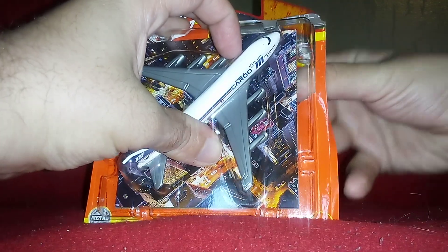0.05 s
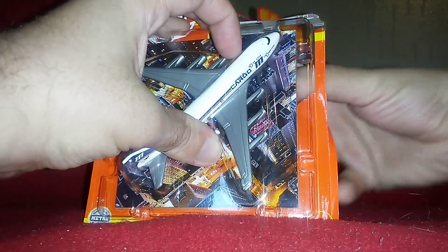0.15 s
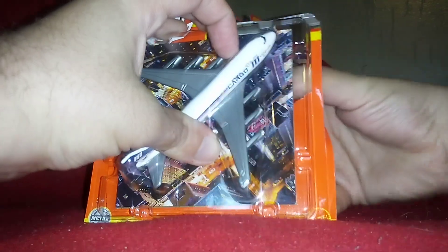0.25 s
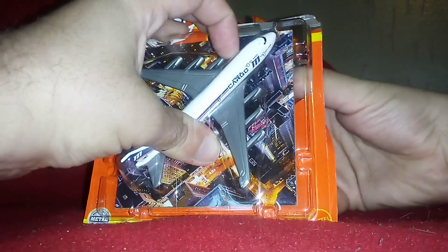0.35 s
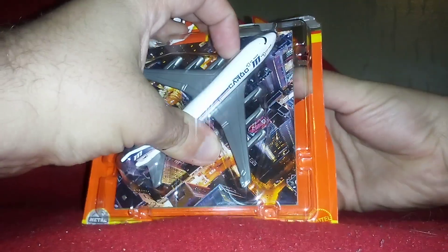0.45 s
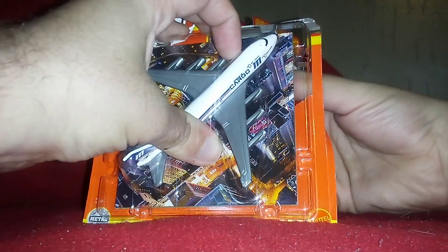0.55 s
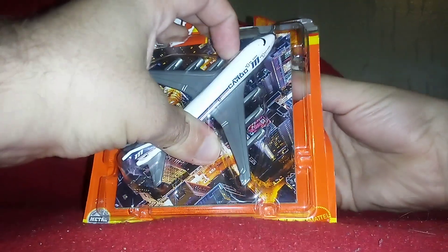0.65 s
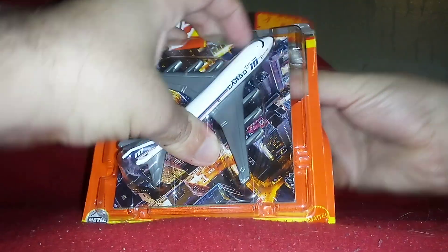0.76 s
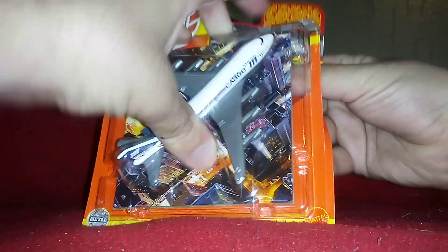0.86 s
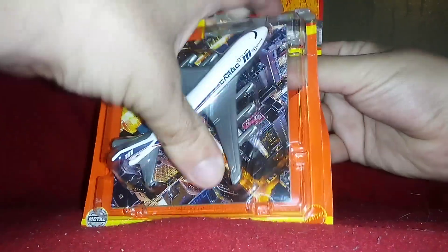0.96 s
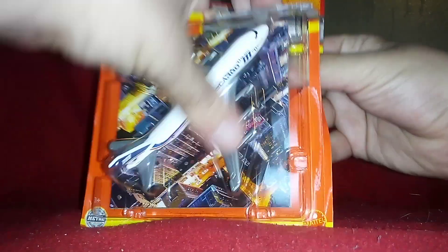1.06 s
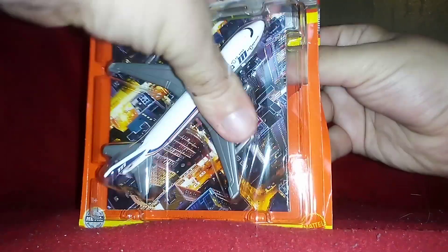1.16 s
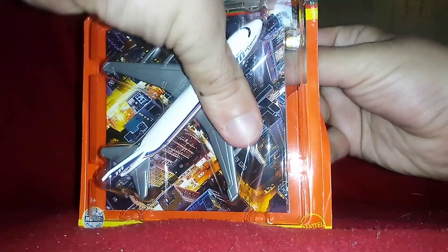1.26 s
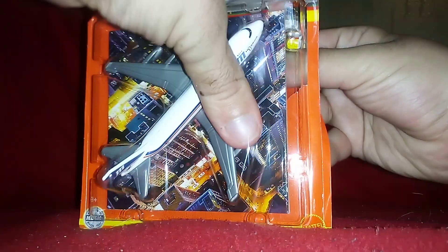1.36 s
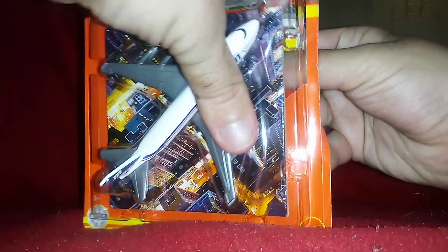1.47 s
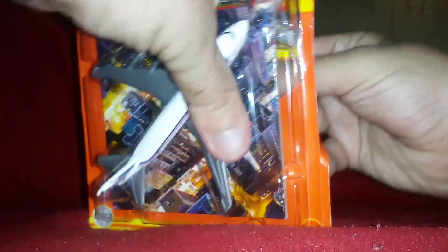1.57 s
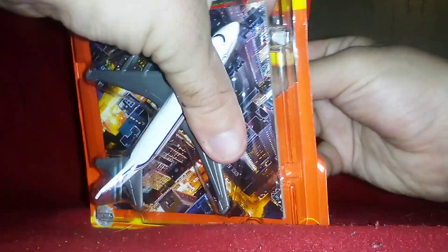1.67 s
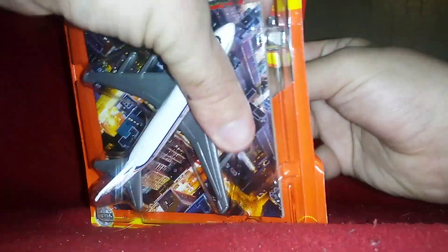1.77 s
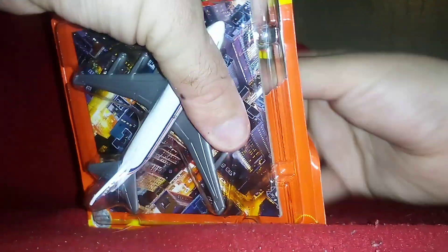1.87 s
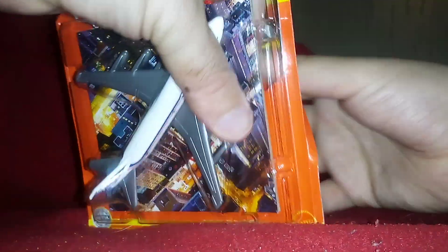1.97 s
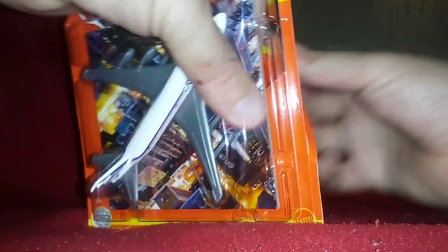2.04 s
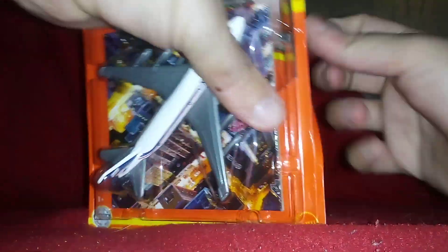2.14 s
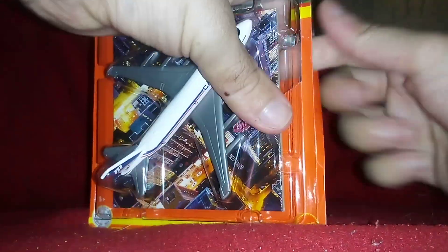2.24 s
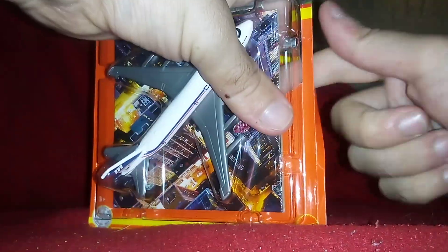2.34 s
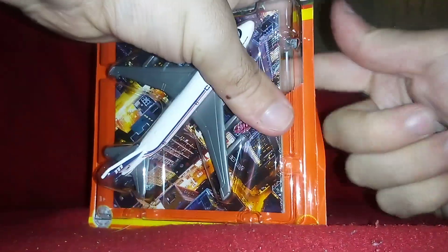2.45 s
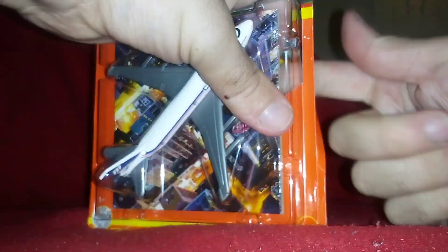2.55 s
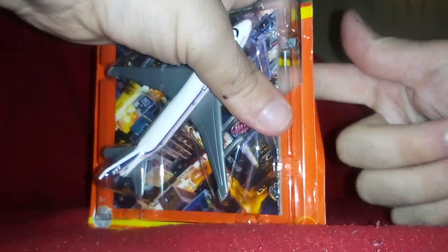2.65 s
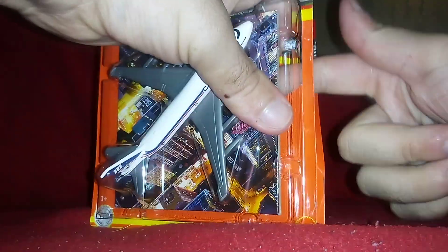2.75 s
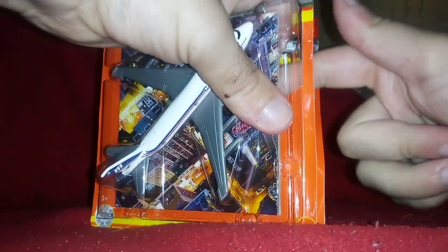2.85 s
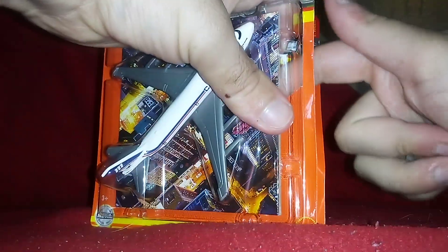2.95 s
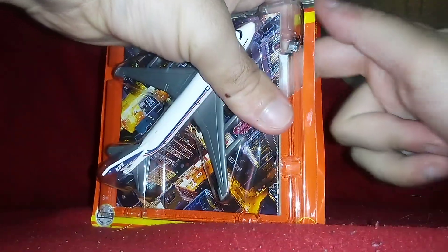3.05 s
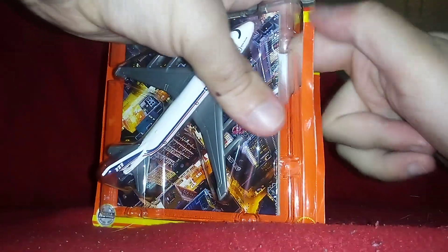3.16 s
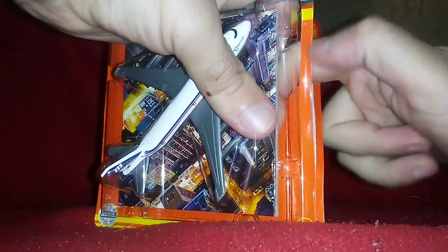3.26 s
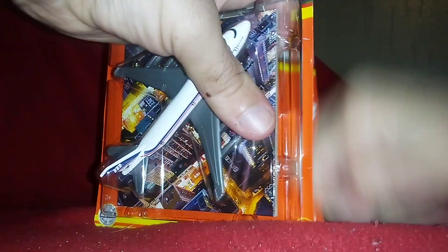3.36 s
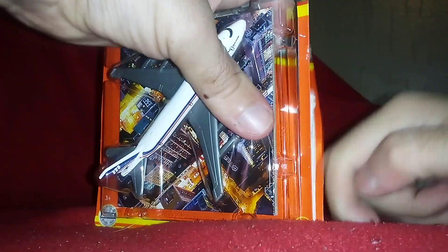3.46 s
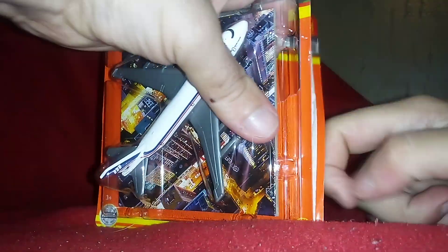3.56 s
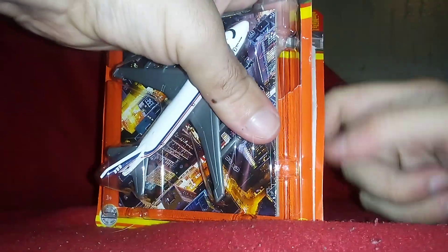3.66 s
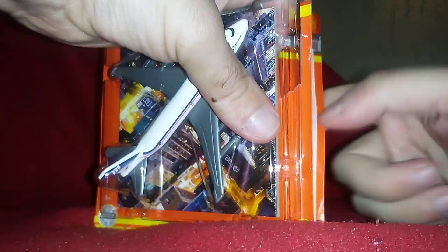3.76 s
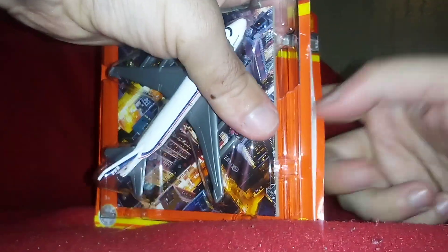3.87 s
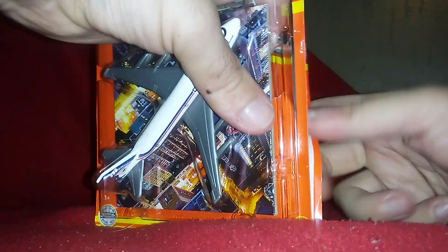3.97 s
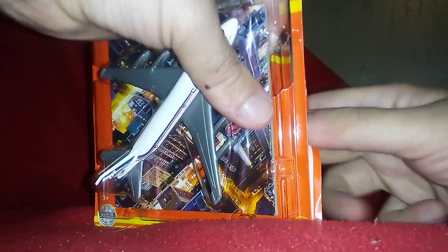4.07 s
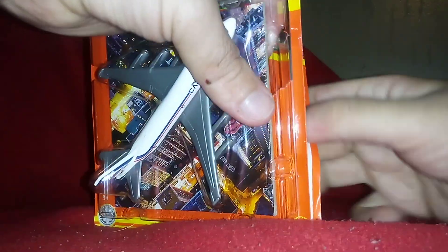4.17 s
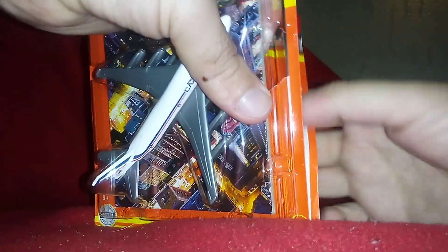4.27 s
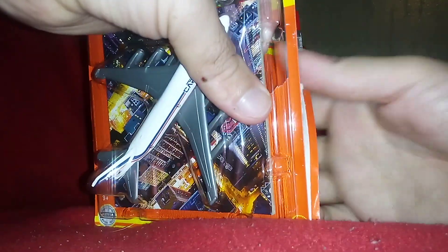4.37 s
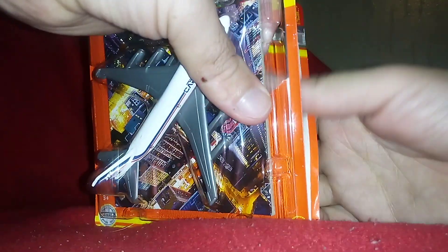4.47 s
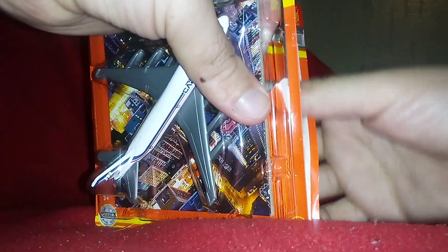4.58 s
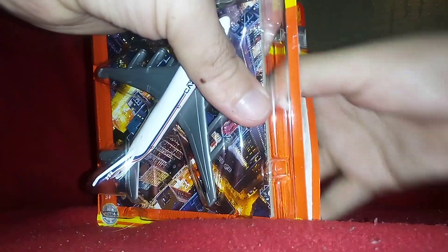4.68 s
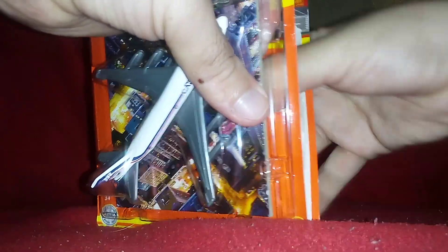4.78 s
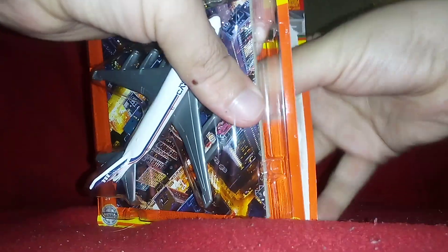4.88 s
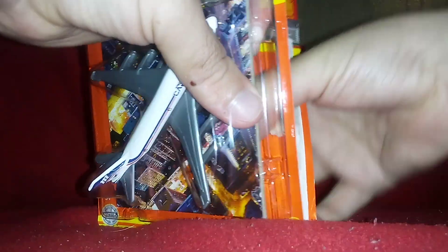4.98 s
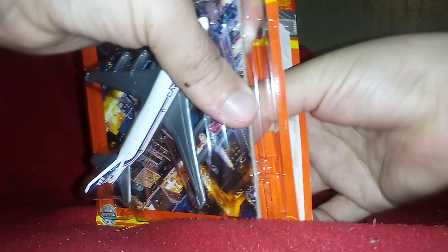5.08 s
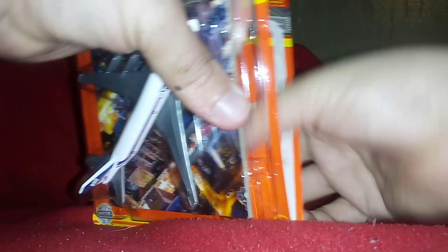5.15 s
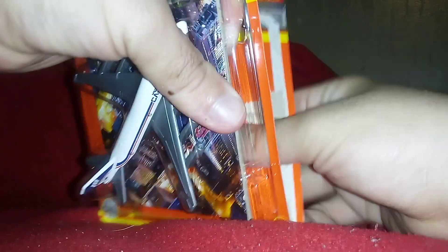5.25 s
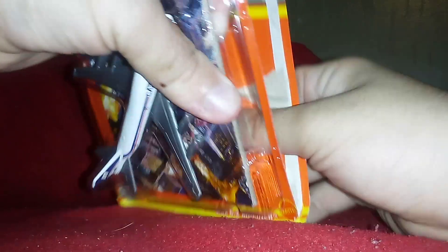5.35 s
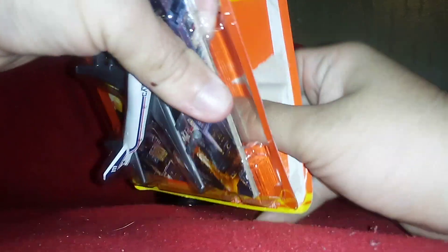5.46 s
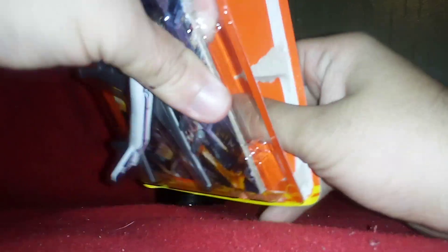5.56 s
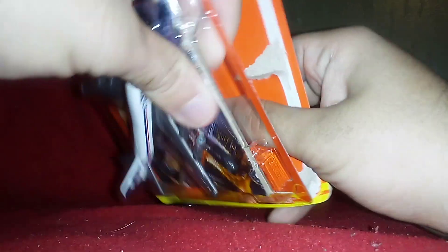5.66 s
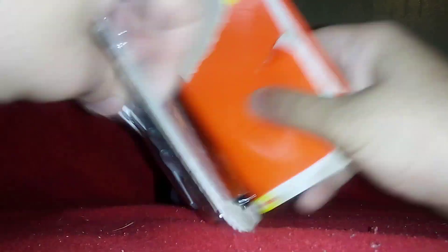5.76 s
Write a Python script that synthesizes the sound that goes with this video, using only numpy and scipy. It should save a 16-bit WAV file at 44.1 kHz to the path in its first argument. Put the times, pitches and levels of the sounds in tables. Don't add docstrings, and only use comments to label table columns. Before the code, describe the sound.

Hands pry and peel a hollow plastic blister pack from its card, with creaks, sharp pops, film ticks and grainy crackling, close and dry.

```python
import sys
import numpy as np
from scipy import signal
from scipy.io import wavfile
from scipy.ndimage import uniform_filter1d

SR = 44100
rng = np.random.default_rng(int(sys.argv[2]) if len(sys.argv) > 2 else 0)


def how_loud(loudness_db):
    steps = np.asarray(loudness_db, float) / 20
    return 10 ** steps


def store_wav(level_fs):
    pcm = np.round(np.clip(np.atleast_2d(level_fs), -1, 1) * 32767)
    wavfile.write(sys.argv[1], SR, pcm.T.astype(np.int16))


N = 256662

# [f/Hz, width/Hz, level/dB]
BODY = [(366, 100, -11), (490.3, 37, -5.5), (567, 90, -7), (738, 170, -2), (882, 73, 1),
        (1117.6, 103, -2.5), (1230, 90, 0), (1303, 100, -4.5), (1693, 190, -7)]
# [f/Hz, width/Hz, level/dB]
CARD = [(1925, 150, 4), (2390, 377, 0.5), (2797, 584, 0.5), (3270, 880, -1), (4040, 1370, -7.5)]
# [f/Hz, width/Hz, level/dB]
FILM = [(4590, 530, -10), (6090, 2120, -8), (6574, 350, -1.5), (7250, 700, -4.5), (7760, 1900, -8)]
# [f/Hz, width/Hz, level/dB]
TABLE = [(80, 36, -1), (132, 69, -1.5), (182, 95, 1), (265, 140, 1.5)]
# [t/s, peak level/dB, strongest f/Hz]
CREAKS = [(0.195, -46, 1170), (0.303, -40, 1100), (0.43, -44, 1750), (0.453, -40.5, 1360),
          (0.519, -41, 946), (0.595, -42, 1075), (1.349, -30.5, 491.5), (1.203, -31.5, 1390),
          (1.628, -47, 1160), (1.811, -41.5, 828), (1.982, -41, 793), (2.338, -43, 1120),
          (0.227, -31.5, 1450), (5.645, -31.5, 1210), (3.059, -57, 940), (3.762, -35, 934),
          (5.244, -34.5, 766), (5.418, -35.5, 1190), (3.13, -44.5, 710), (3.26, -54, 880),
          (3.359, -30.5, 740), (3.56, -49, 775), (3.897, -52.5, 1230), (4.271, -46, 1240),
          (4.408, -76, 743), (4.882, -41.5, 1250), (5.125, -45.5, 704), (5.196, -40, 1190),
          (5.287, -35, 1100), (5.455, -35.5, 933)]
# [t/s, peak level/dB, strongest f/Hz, card edge level/dB]
POPS = [(0.199, -43.5, 960, -38), (0.22, -37, 1500, -37), (0.373, -36.5, 382, -77),
        (0.42, -37.5, 1350, -46), (0.955, -31.5, 995, -36.5), (1.121, -29.5, 930, -45),
        (1.143, -31.5, 850, -64), (1.287, -32, 637, -46), (1.35, -24, 864, -40), (1.526, -14.5, 883, -32.5),
        (1.534, -21.5, 1100, -33), (1.931, -35, 834, -41), (2.263, -28.5, 920, -39.5),
        (2.858, -29.5, 1183, -46.5), (3.224, -35, 1200, -42), (3.284, -18.5, 1154, -30.5),
        (3.301, -13.5, 732, -32), (3.378, -20, 1244, -45), (3.485, -31.5, 786, -41.5),
        (3.754, -23, 943, -53), (4.657, -33.5, 1230, -49), (4.792, -32.5, 824, -38.5),
        (5.008, -33.5, 693, -66), (5.404, -28, 806, -46), (5.487, -34, 404, -43.5), (5.712, -28, 900, -53),
        (5.699, -17.5, 742, -29), (5.704, -16, 1155, -28), (5.738, -23.5, 626, -36),
        (5.753, -14.5, 1270, -30)]


def rms_one(x):
    return x / np.sqrt(np.mean(x ** 2) + 1e-20)


def drift(rate):
    step = 40
    r = np.exp(-2 * step * np.pi * rate / SR)
    noise = rng.standard_normal(N // step + 2002)
    slow = signal.lfilter([1], [1, -2 * r, r * r], noise)[2000:]
    return np.interp(np.arange(N) / step, np.arange(len(slow)), rms_one(slow))


def resonate(x, hz, width_hz):
    r = np.exp(-np.pi * width_hz / SR)
    zeros = np.array([1, 0, -1]) * (1 - r * r) / 2
    poles = [1, -2 * r * np.cos(2 * np.pi * hz / SR), r * r]
    return signal.lfilter(zeros, poles, x)


def within(x, modes):
    edges_hz = [0.91 * modes[0][0], 1.177 * modes[-1][0]]
    return signal.sosfilt(signal.butter(3, edges_hz, "band", fs=SR, output="sos"), x + 1e-18)


def near(modes, hz, fall_db):
    own = (hz, np.mean(np.array(modes)[:, 1]), 1.5)
    others = [(f, width_hz, level_db - fall_db * abs(np.log2(f / hz))) for f, width_hz, level_db in modes]
    return [own] + others


def struck(modes, t60, slip_s, chance):
    t = np.arange(int(0.15 * SR)) / SR
    hz, width_hz, level_db = np.transpose(modes)[:, :, None]
    tune = chance[:len(modes), None]
    strength = chance[10:10 + len(modes), None]
    slips = chance[20:]
    fall = np.log(1000) / max(t60, 0.003) * (0.29 + 0.48 * width_hz / width_hz.mean())
    tones = np.sin(2 * np.pi * hz * (1 + 0.012 * tune) * t)
    rings = how_loud(level_db + 6.5 * strength) * tones * np.exp(-fall * t)
    age = np.arange(len(slips)) / (slip_s * SR)
    push = slips * np.abs(slips) * age * np.exp(-age)
    piece = signal.fftconvolve(rings.sum(axis=0), push)[:len(t)]
    return piece / np.abs(piece).max()


def add(out, s, piece):
    i = int(s * SR)
    out[i:i + len(piece)] += piece[:N - i]


def bucklings():
    return POPS + [(s, peak_db, hz, peak_db - 39.5) for s, peak_db, hz in CREAKS]


def hush():
    white = rng.standard_normal((2, N))
    dull = signal.lfilter([1], [1, -0.75], white[0])
    rumble = signal.sosfilt(signal.butter(2, 90, fs=SR, output="sos"), white[1])
    return how_loud(-89) * rms_one(dull) + how_loud(-72.5) * rms_one(rumble)


def stroke_levels():
    # [start t/s, level/dB, film against body/dB, swell/dB]
    prying = [(0.0, -53.5, -6.5, -15.5), (0.042, -59, -3, -2), (0.189, -59.5, -13.5, -26.5),
              (0.37, -49.5, -31, 7), (0.442, -60, -14, -15), (0.56, -74, -13, 6.5), (0.677, -64.5, -7, 5.5),
              (0.782, -53.5, -15.5, 3.5), (0.944, -56, -7, -35), (1.018, -62, -5, 2),
              (1.06, -50.5, -6.5, 3.5), (1.143, -46, -3, -2.5), (1.24, -58, 1, -6), (1.285, -54, -0.5, -16),
              (1.346, -50, -5.5, 5), (1.528, -47.5, -9, -20), (1.764, -56.5, -5.5, -9.5),
              (1.886, -56, -11.5, 5.5), (2.007, -57.5, -11, -2.5), (2.26, -61.5, -9.5, -19.5),
              (2.341, -63.5, -11.5, -1.5), (2.442, -73.5, -18.5, -38), (2.512, -65.5, -27, 7),
              (2.856, -69, -10, -18), (2.937, -73, -9, -9)]
    # [start t/s, level/dB, film against body/dB, swell/dB]
    peeling = [(3.039, -55.5, -10, 10), (3.287, -40.5, -14, 5.5), (3.356, -39.5, -9, -0.5),
               (3.419, -56.5, -13, -10), (3.479, -62, -8, -30), (3.553, -60.5, -8.5, 26.5),
               (3.645, -56, -7.5, -11), (3.751, -50, -11.5, -27), (3.797, -74.5, -6, -30),
               (3.885, -62.5, -12.5, 2), (4.045, -59, -6, -19), (4.165, -55.5, -10, 21.5),
               (4.305, -60.5, -4, -20.5), (4.397, -54.5, -5, -7.5), (4.522, -57.5, -18, -14.5),
               (4.594, -52, -8.5, 22), (4.688, -51.5, -9, -1), (4.815, -61.5, -4.5, -8),
               (4.884, -53.5, -7.5, 3), (5.022, -61.5, -8, 3), (5.112, -51.5, -8, -3),
               (5.245, -45.5, -12, -2), (5.428, -51, -2.5, 3), (5.599, -48, -4, 4.5), (5.692, -38, -9, 0.5)]
    # [t/s, rumble level/dB]
    weight = [(0.0, -86), (0.48, -80), (1.02, -93), (1.17, -67), (1.38, -70), (1.72, -80.5), (2.17, -68),
              (2.5, -74.5), (3.06, -73.5), (3.47, -64.5), (3.58, -59), (3.73, -78), (4.38, -88.5),
              (5.22, -70.5), (5.38, -68), (5.82, -66.5)]
    start, level_db, film_db, swell_db = np.transpose(prying + peeling)
    t = np.arange(N) / SR
    now = np.clip(np.searchsorted(start, t) - 1, 0, None)
    done = (t - start[now]) / np.diff(np.append(start, N / SR))[now]
    stroke = how_loud(level_db[now] + swell_db[now] * (done - 0.5))

    tail_db, tail_t60_s = -26, 0.05
    kicks = np.zeros(N)
    for s, peak_db, _, _ in bucklings():
        kicks[int(s * SR)] = how_loud(peak_db + tail_db)
    tail = signal.lfilter([1], [1, -how_loud(-60 / (tail_t60_s * SR))], kicks)

    body_db = uniform_filter1d(20 * np.log10(stroke + tail), size=300)
    bright_db = uniform_filter1d(film_db[now], size=300)
    card_db = body_db + 0.35 * bright_db
    effort_db = uniform_filter1d(body_db, size=int(0.087 * SR))
    weight_db = np.interp(t, *np.transpose(weight))
    hands_db = 4.5 + weight_db + 0.53 * (effort_db - effort_db.mean())
    return body_db, card_db, body_db + bright_db, hands_db


def grains(per_s, uneven_db, clump_db):
    sizes = how_loud(uneven_db * np.minimum(rng.exponential(1, N), 4)) * rng.choice([-1, 1], N)
    slips = sizes * (rng.random(N) < per_s / SR)
    return how_loud(clump_db * drift(41)) * (rms_one(slips) + 0.5 * rng.standard_normal(N))


def rubbed(modes, slips, patchy_db):
    rings = np.zeros(N)
    for k, (hz, width_hz, level_db) in enumerate(modes):
        gain = (-1) ** k * how_loud(level_db + patchy_db * drift(13.2))
        rings += gain * resonate(slips, hz, width_hz)
    return rms_one(within(rings, modes))


def rubbing():
    body_db, card_db, film_db, hands_db = stroke_levels()
    slips = grains(2500, uneven_db=1.1, clump_db=1.83)
    fine = grains(5000, uneven_db=4.5, clump_db=2.0)
    body = how_loud(body_db - 1.5) * rubbed(BODY, slips, patchy_db=2.5)
    card = how_loud(card_db - 4.5) * rubbed(CARD, 0.39 * slips + fine, patchy_db=1.5)
    film = how_loud(film_db + 1.0) * rubbed(FILM, 0.6 * slips + fine, patchy_db=2.0)
    shuffle = grains(300, uneven_db=5.0, clump_db=-0.5)
    hands = how_loud(hands_db) * rubbed(TABLE, shuffle, patchy_db=3.0)
    return body - card + film + hands


def pops():
    body, edge = np.zeros((2, N))
    chance = rng.standard_normal((len(bucklings()), 2, 820))
    manners = [(0.0012, 15.0, 1.6)] * len(POPS) + [(0.0018, 29, 0.6)] * len(CREAKS)
    for event, manner, (a, b) in zip(bucklings(), manners, chance):
        s, peak_db, hz, edge_db = event
        slip_s, fall_db, spread = manner
        hit = struck(near(BODY, hz, fall_db), 33.0 / hz, slip_s, a)
        ring = resonate(hit, hz, spread * hz)
        add(body, s, how_loud(peak_db) * ring / np.abs(ring).max())
        add(edge, s, how_loud(edge_db + 8.0) * struck(CARD, 0.0045, slip_s, b))
    return within(body, BODY) + within(edge, CARD)


def ticks():
    # [t/s, peak level/dB]
    snaps = [(0.2276, -32), (0.4154, -37.5), (0.4326, -28.5), (0.598, -47), (0.944, -45), (1.0617, -33.5),
             (1.1453, -42), (1.2885, -38), (1.3473, -18), (1.3947, -33), (1.5318, -22), (1.6337, -34),
             (1.7489, -43.5), (1.932, -25), (1.983, -37.5), (2.8584, -38.5), (3.176, -36.5), (3.2235, -33),
             (3.2839, -22), (3.3488, -34.5), (4.0496, -34), (4.4016, -40.5), (4.684, -41), (4.789, -19.5),
             (4.878, -36), (5.4163, -25.5), (5.4856, -27), (5.5668, -26.5), (5.6273, -28.5), (5.6472, -19)]
    flicks = [(s, edge_db + 1) for s, _, _, edge_db in POPS]
    rows = snaps + flicks
    out, chance = np.zeros(N), rng.standard_normal((len(rows), 820))
    for (s, peak_db), a in zip(rows, chance):
        add(out, s, how_loud(peak_db) * struck(FILM, 0.0028, 0.00043, a))
    return within(out, FILM)


def thumps():
    # [t/s, peak level/dB, strongest f/Hz]
    knocks = [(0.77, -50, 73.6), (1.109, -47.5, 150), (1.282, -34, 164), (1.397, -49, 135),
              (1.523, -31.5, 177), (1.942, -42.5, 270), (2.2, -44.5, 111), (2.261, -32, 120),
              (3.221, -38, 142), (3.291, -30.5, 312), (3.478, -26.5, 165), (3.592, -41, 170),
              (3.747, -33, 224), (4.062, -38.5, 93), (4.409, -45.5, 86), (4.746, -41.5, 198),
              (4.997, -47.5, 353), (5.295, -41, 157), (5.393, -42, 254), (5.542, -49.5, 238),
              (5.704, -30.5, 135), (5.75, -35.5, 300)]
    modes = TABLE + BODY[:2]
    out, chance = np.zeros(N), rng.standard_normal((len(knocks), 820))
    for (s, peak_db, hz), a in zip(knocks, chance):
        add(out, s, how_loud(peak_db) * struck(near(modes, hz, fall_db=1.5), 0.074, 0.0021, a))
    return within(out, modes)


def taps():
    # [t/s, peak level/dB]
    drumming = [
        (2.774, -35.5),
        (2.793, -33),
        (2.943, -39),
        (2.965, -32.5),
        (2.994, -34),
        (3.011, -34),
        (5.552, -30),
    ]
    # [f/Hz, width/Hz, level/dB]
    tapped = [(170, 160, -17), (300, 76, 3), (547, 750, 12.5), (731, 96, -2), (1100, 140, -2),
              (1720, 370, -25), (2570, 570, -20), (3030, 400, -25)]
    out, chance = np.zeros(N), rng.standard_normal((len(drumming), 820))
    chance[:, :20] *= 0.3
    for (s, peak_db), a in zip(drumming, chance):
        add(out, s, how_loud(peak_db) * struck(tapped, 0.022, 0.00011, a))
    return within(out, tapped)


def scene():
    return (pops() + thumps() + ticks() + rubbing() + hush() + taps())[None]


def band_limit(x):
    return signal.sosfilt(signal.butter(12, 8720, fs=SR, output="sos"), x)


def record(dry):
    x = signal.sosfilt(signal.butter(3, 55, "high", fs=SR, output="sos"), dry)
    x = signal.sosfilt(signal.butter(14, 8550, fs=SR, output="sos"), x)
    x = signal.sosfilt(signal.cheby2(8, 50, 9000, fs=SR, output="sos"), x)
    mix = x + how_loud(-99) * rng.standard_normal(x.shape)
    return band_limit(mix)


dry = scene()
out = record(dry)
store_wav(out)
```